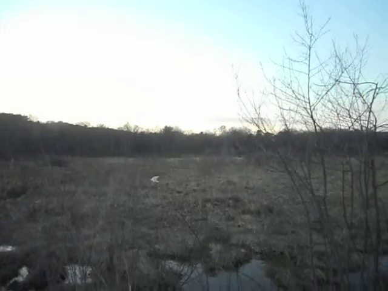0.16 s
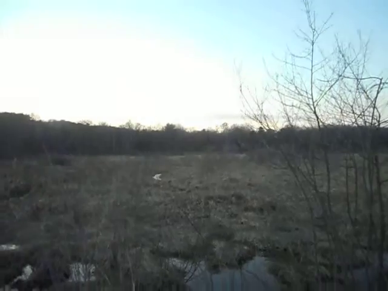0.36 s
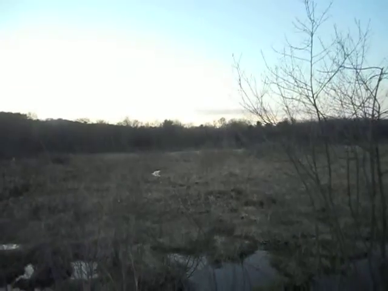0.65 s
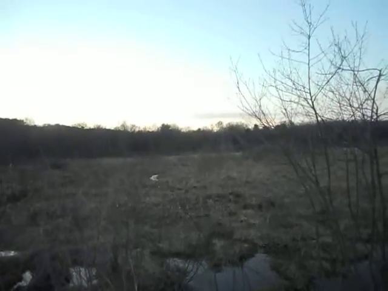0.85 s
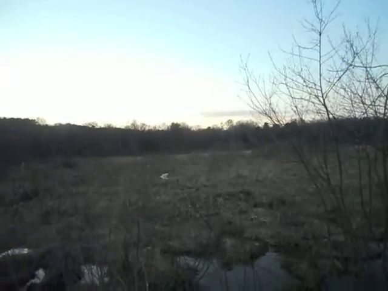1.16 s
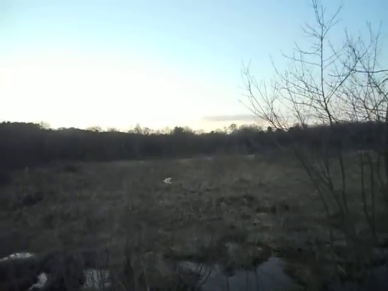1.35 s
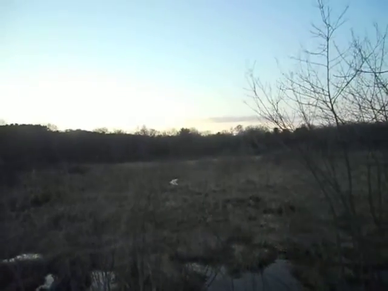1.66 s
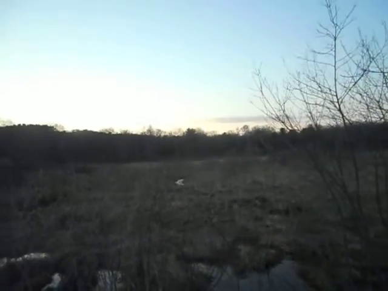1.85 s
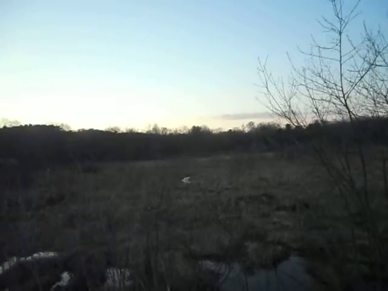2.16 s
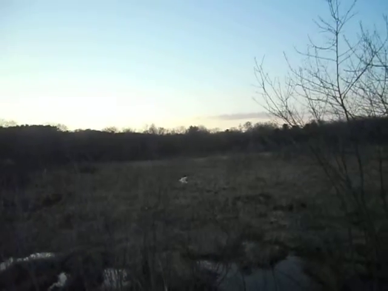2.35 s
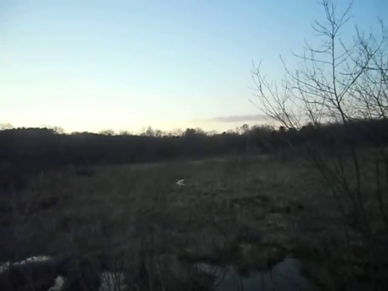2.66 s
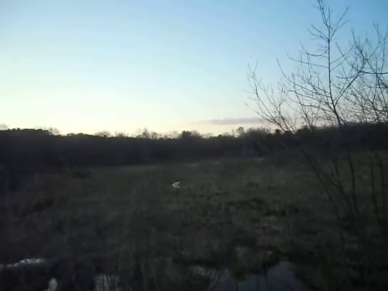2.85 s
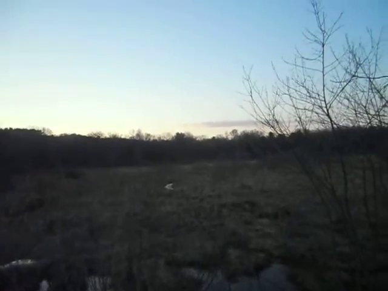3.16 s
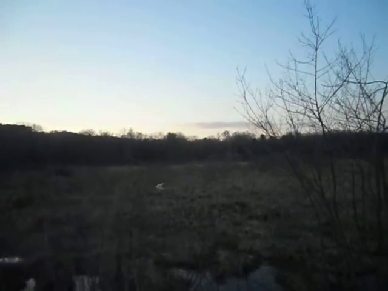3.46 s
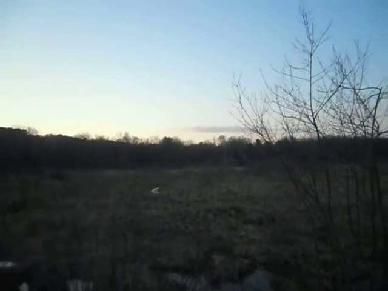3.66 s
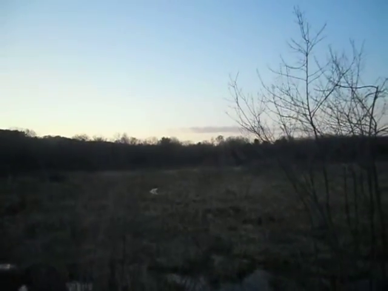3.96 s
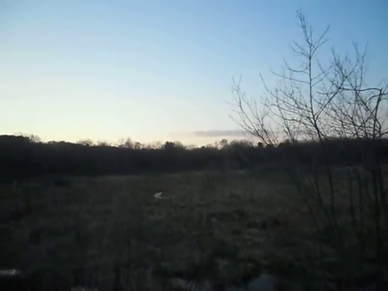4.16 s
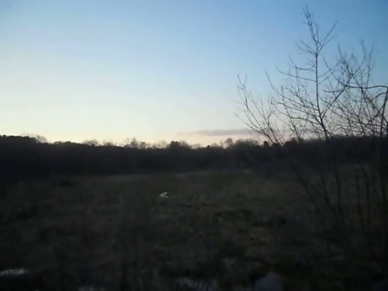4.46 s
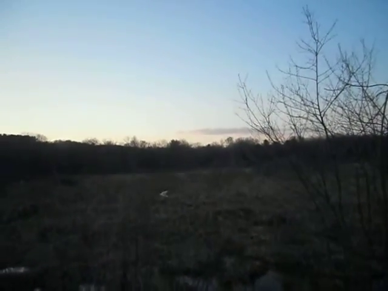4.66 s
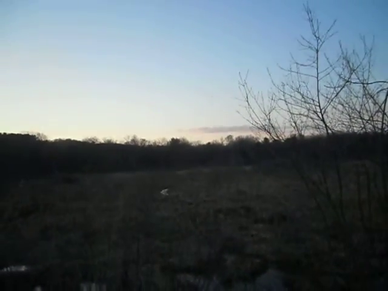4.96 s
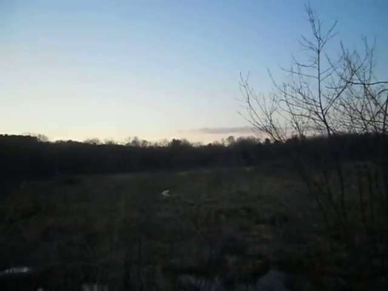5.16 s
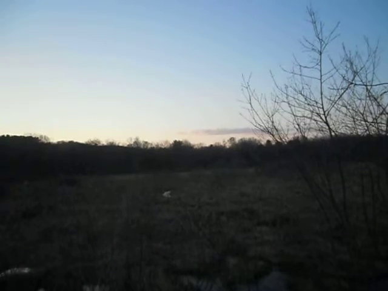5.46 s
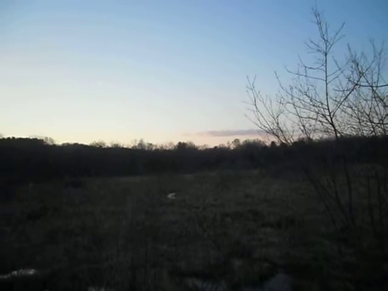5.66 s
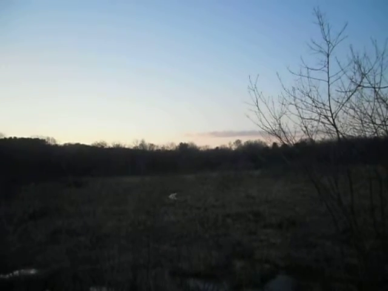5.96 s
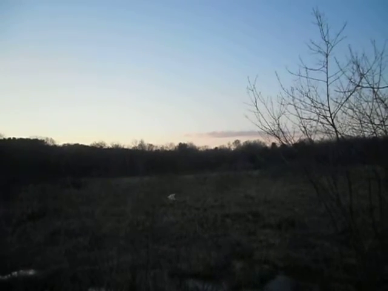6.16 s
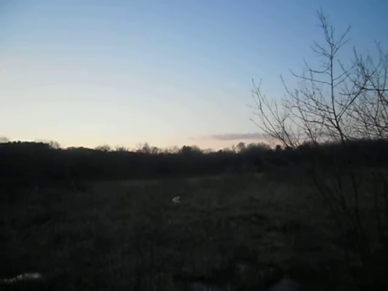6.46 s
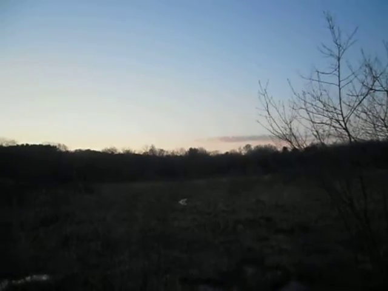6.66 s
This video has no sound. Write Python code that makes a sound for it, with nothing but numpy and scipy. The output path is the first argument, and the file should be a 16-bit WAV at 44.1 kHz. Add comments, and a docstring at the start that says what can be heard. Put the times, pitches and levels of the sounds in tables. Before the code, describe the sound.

In an open marsh, a dense chorus of small frogs peeps throughout, with nearer frogs giving short, high, rising whistles. The sound fades up as wind rumbles and thumps on a hand-held microphone, over faint hiss and a far road. Dry reeds rustle briefly, then a sharp click on the camera case about halfway makes everything drop in level. The sound creeps back, and a strong wind thump follows.

```python
"""A marsh at dusk. A dense chorus of small frogs peeps over the wash of a far road, each call a short
whistle that rises as the vocal sac fills. Wind buffets the microphone of a hand-held camera and stirs
the reeds; dry stalks brush together and a far bird chips twice. The camera's gain starts low and creeps
up; one sharp click on its case knocks the gain down, and it creeps up again."""
import sys
import numpy as np
from scipy import signal
from scipy.fft import rfft, irfft, next_fast_len
from scipy.io import wavfile
from scipy.ndimage import uniform_filter1d, map_coordinates

SR = 44100
rng = np.random.default_rng(int(sys.argv[2]) if len(sys.argv) > 2 else 0)


def int16_out(signal):
    """Quantize to a 16-bit WAV file."""
    q = np.round(np.clip(np.atleast_2d(signal).T, -1, 1) * 32767)
    wavfile.write(sys.argv[1], SR, q.astype(np.int16))


N = 299880


def amp(db):
    """Decibels to gain."""
    return 10 ** (np.asarray(db) / 20)


def unit(x):
    """Scale to rms 1."""
    return x / np.sqrt(np.mean(x ** 2) + 1e-20)


def curve(rows):
    """An automation lane: (time_s, value) rows as one value per sample."""
    return np.interp(np.arange(N) / SR, *np.transpose(rows))


def wobble(rate):
    """Smooth random modulation, rate knots a second."""
    knots = rng.standard_normal(int(N * rate / SR) + 4)
    return map_coordinates(knots, [np.arange(N) * rate / SR])


def filtered(x, response):
    """EQ x with a gain that is a function of frequency."""
    size = next_fast_len(N + SR // 2)
    return irfft(rfft(x, size) * response(np.fft.rfftfreq(size, 1 / SR)), size)[:N]


def noise(spectrum):
    """Noise of rms 1, coloured by (freq_hz, level_db) rows."""
    hz, db = np.transpose(spectrum)
    white = rng.standard_normal(N)
    return unit(filtered(white, lambda f: amp(np.interp(np.log(f + 1), np.log(hz), db))))


def add(track, start_s, sound):
    """Mix a sound into the track from start_s on."""
    start = round(start_s * SR)
    first, last = max(start, 0), min(start + len(sound), len(track))
    if last > first:
        track[first:last] += sound[first - start:last - start]


# Tone of the far road: freq_hz, level_db
ROAD_SPECTRUM = [(30, -17), (100, -17), (280, -1), (430, -6), (600, -3), (760, 3.5), (930, -3), (1150, -5),
                 (1500, -11.5), (2200, -18.5), (4000, -61), (12000, -80)]
def road(level_db=-39):
    """The steady wash of a far road, with a slight waver."""
    return amp(level_db + 0.48 * wobble(12)) * noise(ROAD_SPECTRUM)


# Tone of the hiss bed: freq_hz, level_db
HISS_SPECTRUM = [(100, 1), (1500, 0), (2400, 5.5), (3600, 2.5), (4500, 2), (6500, 0), (8500, -1),
                 (10000, -1.5), (10700, -10.5), (11200, -19.5), (12000, -21), (12600, -80)]
# Narrow resonances of the case around the microphone: freq_hz, width_hz, gain_db
CASE_RESONANCES = [(3430, 90, 0), (3930, 110, -2.5), (5355, 105, 0), (7100, 150, -0.5), (7870, 180, 3.5),
                   (8600, 96, -0.5)]
def hiss(level_db=-43):
    """A bed of hiss that sings faintly in the camera's case."""
    def case(f):
        return 1 + sum((amp(db) - 1) * 1j * f * width / (hz * hz - f * f + 1j * f * width)
                       for hz, width, db in CASE_RESONANCES)
    return amp(level_db) * filtered(noise(HISS_SPECTRUM), case)


# Strength of the wind at the microphone: time_s, level_db
WIND_LEVELS = [(0, -33), (.5, -35.5), (.9, -32), (1.28, -35), (1.39, -23.5), (1.57, -34), (2, -29.5),
               (2.4, -36.5), (2.66, -27), (2.78, -30.5), (3.03, -24.5), (3.3, -30.5), (3.75, -34.5),
               (4.15, -29), (4.85, -34), (5.65, -36.5), (6.4, -44.5), (6.8, -36.5)]
# Tone of its rumble: freq_hz, level_db
RUMBLE_SPECTRUM = [(10, -15.5), (22, 1), (34, 0.5), (55, -5.5), (90, -8), (130, -9.5), (200, -17.5),
                   (300, -24), (600, -38), (1500, -82), (6000, -120)]
def wind(flurry_db=2.4, flurries_per_s=7):
    """Turbulence on the microphone: a dull, low rumble that swells and fades in flurries."""
    level_db = curve(WIND_LEVELS) + flurry_db * wobble(flurries_per_s)
    rumble = noise(RUMBLE_SPECTRUM) * amp(2.05 * wobble(25))
    lows = filtered(rumble, lambda f: 1 / (1 + (f / 90) ** 2))
    flow = lows + .3 * (rumble - lows)  # shelved down above 90 Hz
    running_rms = np.sqrt(np.abs(uniform_filter1d(flow ** 2, size=SR // 8)) + 1e-9)
    return amp(level_db) * flow / running_rms


def peep(length_s, pitch_hz, rise_hz, arch=.15):
    """One frog call: a pure whistle that slides up as the vocal sac fills; arch eases off the slide."""
    progress = np.linspace(0, 1, max(int(length_s * SR), 2))
    hz = pitch_hz + rise_hz * (progress + arch * progress * (1 - progress))
    swell = np.abs(np.sin(np.pi * progress ** 1.13)) ** 0.64  # loudest just past the middle
    return swell * np.sin(2 * np.pi * np.cumsum(hz) / SR)


def marsh_reverb(x, wet_db, t60_s):
    """Reeds and the edge of the woods scatter a faint tail after each call."""
    t = np.arange(SR // 2) / SR
    tail = rng.standard_normal(len(t)) * amp(-60 * t / t60_s) * (1 - np.exp(-t / 0.032))
    return x + amp(wet_db) * signal.fftconvolve(x, tail / np.linalg.norm(tail))[:N]


def far_frogs(voices, count, rise_hz, length_s, shortest_period_s, spread_db):
    """Frogs call over and over, each at its own pitch, pace and distance."""
    calls = np.zeros(N)
    pitches = np.interp((np.arange(count) + .5) / count, *np.transpose(voices))
    for pitch_hz, (slowness, distance, phase) in zip(pitches, rng.random((count, 3))):
        for beat, (late, sharp, loud, longer) in enumerate(rng.standard_normal((20, 4))):
            start_s = (beat - 1 + phase + .08 * late) * shortest_period_s * (1 + slowness / 2)
            if start_s < N / SR:
                slide_hz = rise_hz * np.exp(.2 * longer)
                start_hz = pitch_hz + 30 * sharp - slide_hz / 2
                call = peep(length_s * np.exp(0.149 * longer), start_hz, slide_hz)
                add(calls, start_s, amp(2 * loud - spread_db * distance) * call)
    return unit(marsh_reverb(calls, wet_db=-6.5, t60_s=0.5))


# Spread of voices in the frog crowd: share_calling_lower, pitch_hz
CROWD_VOICES = [(0, 2655), (.05, 2791), (.2, 2885), (.5, 2971), (0.849, 3071), (1.001, 3170)]
def chorus(crowd_db=-36, swell_db=.5, neighbours_db=-46):
    """The crowd merges into a shimmering band; a few neighbours peep at a slower pace in front of it."""
    crowd = far_frogs(CROWD_VOICES, count=84, rise_hz=233, length_s=.115,
                      shortest_period_s=.45, spread_db=8.5)
    neighbours = far_frogs([(0, 2780), (1, 3100)], count=6, rise_hz=235.6, length_s=.11,
                           shortest_period_s=.8, spread_db=2.5)
    return amp(crowd_db + swell_db * wobble(3.01)) * crowd + amp(neighbours_db) * neighbours


# Foreground frog calls: start_s, length_s, start_pitch_hz, level_db
NEAR_CALLS = [(.19, .09, 2840, -32), (.27, .14, 2400, -44), (1.091, .12, 2870, -35), (1.23, .12, 2300, -49),
              (1.28, 0.097, 2690, -30), (1.31, .08, 2850, -32), (1.449, 0.087, 2590, -42),
              (1.59, 0.095, 2735, -37), (1.719, .16, 2580, -36.5), (1.75, 0.12, 2880, -34),
              (1.95, .12, 3190, -43), (2.22, 0.098, 2780, -32), (2.36, 0.19, 2670, -34),
              (2.41, 0.093, 2880, -30), (2.84, .19, 2670, -31), (3.03, .12, 2620, -38),
              (3.1, .11, 2850, -31), (3.391, 0.12, 2880, -30), (3.89, 0.12, 3120, -42),
              (4.07, .15, 2390, -44), (4.13, 0.15, 2780, -32.5), (4.78, .1, 3200, -39.5),
              (4.869, 0.089, 2930, -29), (4.938, .16, 2500, -43), (4.99, 0.085, 2980, -33.5),
              (5.332, .11, 2360, -43), (5.63, 0.21, 2700, -31), (5.92, .16, 2410, -43),
              (6.03, .14, 2840, -34), (6.21, .16, 2290, -47), (6.4, .16, 2800, -33.5),
              (6.69, .11, 3040, -37)]
# Smaller frogs call higher, glide faster and arch more: start_pitch_hz, glide_hz_per_s, arch_amount
CALL_GLIDES = [(2300, 1150, 0), (2696, 2150, 0), (2948, 2350, .15), (3210, 2850, 0.66)]
def near_frogs():
    """Single calls stand out of the chorus; each glides at the pace of its frog's size."""
    calls = np.zeros(N)
    voice_hz, glides, arches = np.transpose(CALL_GLIDES)
    for start_s, length_s, pitch_hz, db in NEAR_CALLS:
        rise_hz = length_s * np.interp(pitch_hz, voice_hz, glides)
        arch = np.interp(pitch_hz, voice_hz, arches)
        add(calls, start_s, amp(db) * peep(length_s, pitch_hz, rise_hz, arch))
    waver = amp(-0.3 + 1.8 * wobble(70))  # paths through the reeds fade in and out as the pitch slides
    return marsh_reverb(waver * calls, wet_db=-8.5, t60_s=0.38)


def swirls(count, base_db=-36.5, growth=1.56, pitch_hz=119):
    """Cues for small eddies that come at random and grow with the wind: time_s, peak_db, pitch_hz."""
    times_s = (np.arange(count) + rng.random(count)) / count * N / SR
    strength, smallness = rng.standard_normal((count, 2)).T
    wind_over_db = np.interp(times_s, *np.transpose(WIND_LEVELS)) + 30  # against a wind of -30 dB
    peaks_db = base_db + growth * wind_over_db + 2.2 * strength
    return list(zip(times_s, peaks_db, pitch_hz * np.exp(0.29 * smallness)))


# The hardest wind hits on the microphone: time_s, peak_db, pitch_hz
STRONG_EDDIES = [(.771, -22.5, 76), (1.03, -31, 180), (1.37, -19, 65), (1.425, -18.5, 89),
                 (1.838, -19.5, 117), (2.152, -28.5, 240), (2.635, -25, 144), (2.68, -19.5, 95),
                 (2.955, -15, 72), (3.068, -16.5, 144), (3.105, -18, 150), (3.44, -17, 111),
                 (3.89, -17, 90.5), (4.118, -18, 104), (4.361, -13.5, 95), (4.396, -18, 80),
                 (4.954, -7.5, 105), (5.506, -25, 85)]
def eddies(core_s=0.01, wake_s=0.039, wake_db=-14.5, puff_db=-15.5, puff_db_per_octave=7.5):
    """Each eddy thumps: a swing or two of pressure, with a soft puff inside and a ragged wake."""
    t = np.arange(-SR // 8, SR // 8) / SR
    puff = noise([(60, 2.0), (200, 8.5), (400, -9.5), (650, -8), (1000, -50), (2500, -64), (8000, -100)])
    wake = noise([(20, -9), (45, 0.5), (140, -2), (250, -15), (500, -30), (1500, -70), (6000, -110)])
    swings, puff_envelope, wake_envelope = np.zeros((3, N))
    for time_s, db, hz in STRONG_EDDIES + swirls(count=60):
        start_s = time_s + t[0]
        squeeze = amp(-0.46 * max(db + 20, 0))  # above -20 dB, harder hits are over sooner
        core = amp(db) * np.exp(-(t / (core_s * squeeze)) ** 2)
        puffiness = amp(puff_db + puff_db_per_octave * np.log2(hz / 100))  # smaller eddies are puffier
        add(swings, start_s, core * np.cos(2 * np.pi * hz * t))
        add(puff_envelope, start_s, core * puffiness)
        add(wake_envelope, start_s, amp(db + wake_db) * np.exp(-(t / (wake_s * squeeze)) ** 2))
    return swings + puff_envelope * puff + wake_envelope * wake


# Quick brushes of dry stalks: time_s, level_db
STALK_BRUSHES = [(1.935, -40.5), (1.975, -44)]
def stalks(width_s=0.0096):
    """Dry stalks brush against each other in short, papery scrapes."""
    t = np.arange(N) / SR
    scrape = noise([(300, -50), (1800, -5), (2250, 6), (2700, -8), (4500, -36), (12000, -80)])
    return scrape * sum(amp(db) * np.exp(-((t - time_s) / width_s) ** 2) for time_s, db in STALK_BRUSHES)


# Chips of a far bird: time_s, pitch_hz, level_db
BIRD_CHIPS = [(2.092, 5070, -34.5), (2.66, 5200, -43)]
def bird(width_s=0.0046):
    """A far bird gives two thin chips, each a blip of pure tone."""
    t = np.arange(N) / SR
    return sum(amp(db) * np.exp(-((t - time_s) / width_s) ** 2) * np.sin(2 * np.pi * hz * t)
               for time_s, hz, db in BIRD_CHIPS)


# Swell of a gust in the reeds: time_s, level_db
REED_LEVELS = [(0, -56), (2.55, -59), (2.75, -46.5), (3.2, -46.5), (3.35, -65), (6.8, -70)]
# Tone of their rustle: freq_hz, level_db
RUSTLE_SPECTRUM = [(1000, -28), (2400, -4), (3700, 9), (4600, 1), (6000, -16), (10500, -30), (12500, -80)]
def reeds():
    """A gust lifts the dry reeds into a bright, fluttering rustle."""
    return amp(curve(REED_LEVELS) + wobble(29.5)) * noise(RUSTLE_SPECTRUM)


# Contacts within the click: start_s, first_2ms_rms_db, t60_s, ping_hz, ping_share
CLICK_CONTACTS = [(3.2558, -16.5, 0.036, 3730, 0.36), (3.2605, -11, 0.0048, 7950, 0.81),
                  (3.2602, -16.5, 0.024, 5360, 0.66), (3.272, -24.5, 0.014, 1220, 0.8)]
# Tone of the click's grit: freq_hz, level_db
GRIT_SPECTRUM = [(100, -13), (600, -11), (1200, 0), (1650, -11), (2600, 2), (3700, -0.5), (4800, -5),
                 (6500, -7.5), (8500, 1), (10500, -9.5), (12500, -35), (16000, -28)]
def click():
    """A catch on the case scrapes, snaps home and rebounds; each contact makes the plastic ping."""
    t = np.arange(SR // 20) / SR
    track, grit = np.zeros(N), noise(GRIT_SPECTRUM)
    for start_s, db, t60_s, ping_hz, ping_share in CLICK_CONTACTS:
        scrape = grit[round(start_s * SR):][:len(t)]
        ping = np.sin(2 * np.pi * ping_hz * t)
        envelope = amp(-60 * t / t60_s) * (1 - np.exp(-t / 0.00013))
        contact = ((1 - ping_share) * scrape + ping_share * ping) * envelope
        add(track, start_s, amp(db) * contact / np.std(contact[:SR // 500]))
    return track


def knock(time_s=4.957, level_db=-17.5, pitch_hz=460, width_s=0.0016):
    """The strongest eddy breaks on the microphone with a short, hollow knock."""
    t = np.arange(N) / SR - time_s
    return amp(level_db) * np.exp(-(t / width_s) ** 2) * np.sin(2 * np.pi * pitch_hz * t)


def scene():
    """The mono mix of everything that reaches the microphone."""
    animals = near_frogs() + chorus() + bird()
    weather = wind() + reeds() + eddies() + knock() + stalks()
    return (animals + weather + road() + hiss() + click())[None]


def gain_control(x, start_db, ceiling_db, hold_s, recovery_s, attack_s):
    """The camera's gain starts low and creeps up; a treble peak ducks it, and it holds, then recovers."""
    step = SR // 200  # 5 ms control steps
    treble = np.diff(x, prepend=0)
    treble_power = uniform_filter1d(treble ** 2, size=4 * step, origin=2 * step - 1)
    sidechain = np.sqrt(np.abs(treble_power))[::step]
    gain, wait_s, gains, step_s = amp(start_db), hold_s, [], step / SR
    for level in sidechain:
        if level * gain > amp(ceiling_db):
            gain, wait_s = amp(ceiling_db) / level, hold_s
        elif wait_s > 0:
            wait_s -= step_s
        else:
            gain += (1 - gain) * step_s / recovery_s
        gains.append(gain)
    lag = np.exp(-step_s / attack_s)
    smooth_gain = signal.lfilter([0, 1 - lag], [1, -lag], gains)
    return x * np.interp(np.arange(N), np.arange(len(gains)) * step, smooth_gain)


def record(dry):
    """The camera's chain: automatic gain, a soft clip on the loudest peak, and a steep low-pass."""
    clip_level, cutoff_hz = .9, 16300
    ridden = gain_control(dry[0], start_db=-23.5, ceiling_db=-27.5,
                          hold_s=0.55, recovery_s=0.97, attack_s=0.0086)
    rounded = ridden / (1 + (ridden / clip_level) ** 6) ** (1 / 6)
    return filtered(rounded, lambda f: 1 / np.sqrt(1 + (f / cutoff_hz) ** 120))[None]


dry = scene()
out = record(dry)
int16_out(out)
```